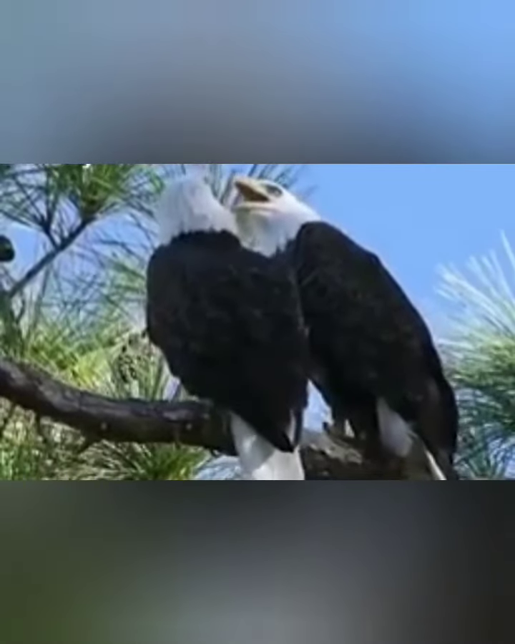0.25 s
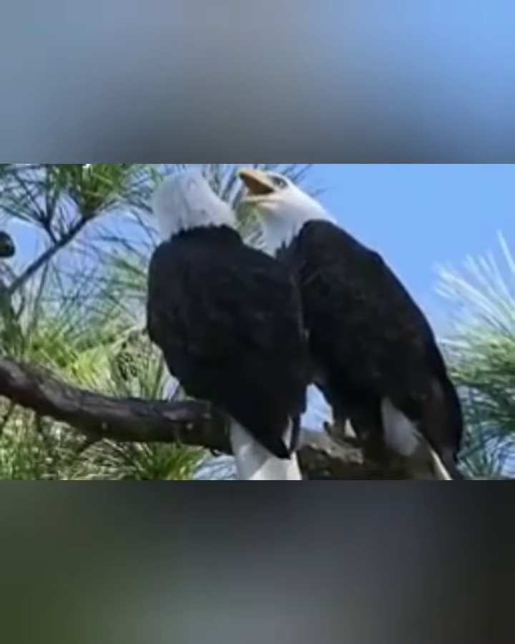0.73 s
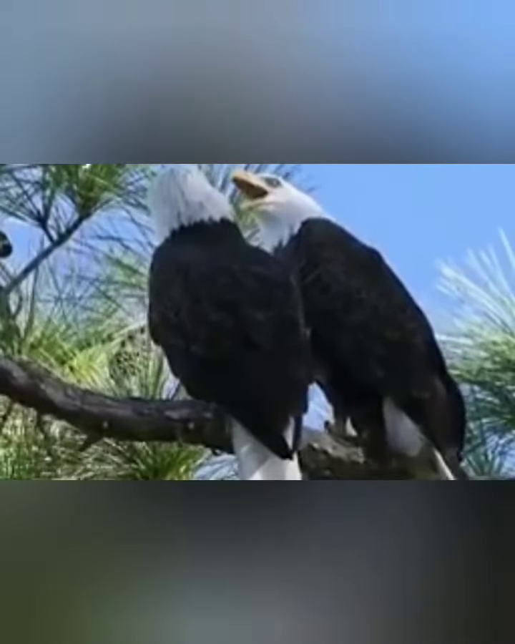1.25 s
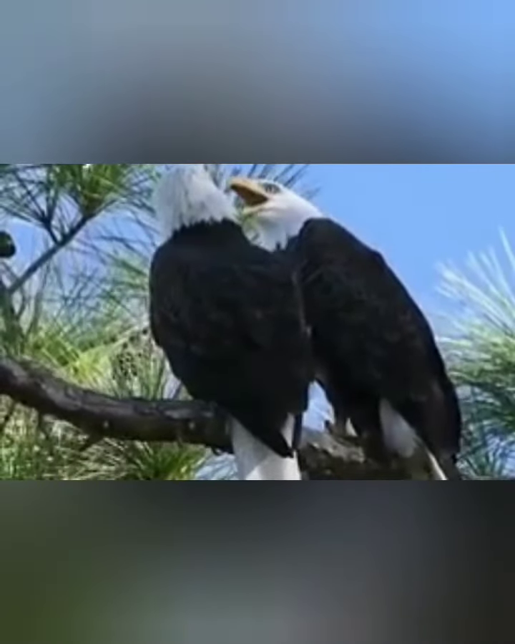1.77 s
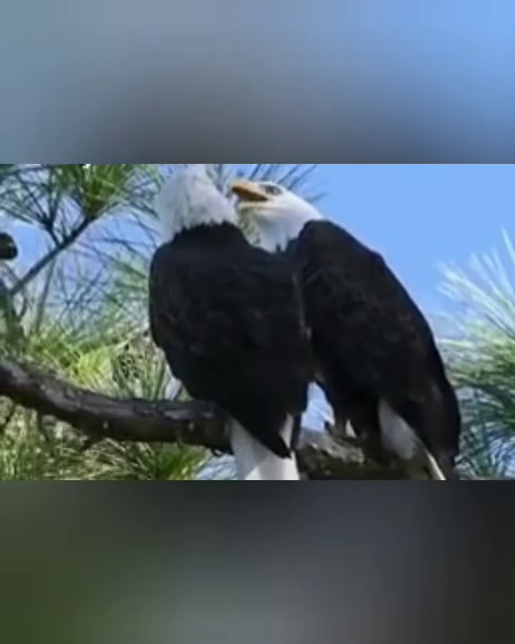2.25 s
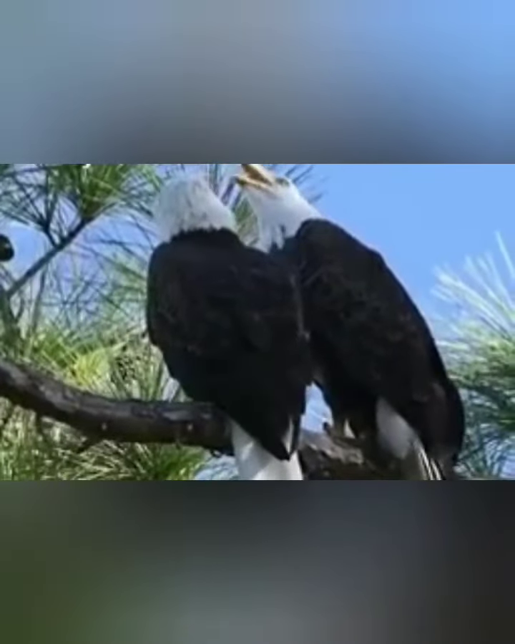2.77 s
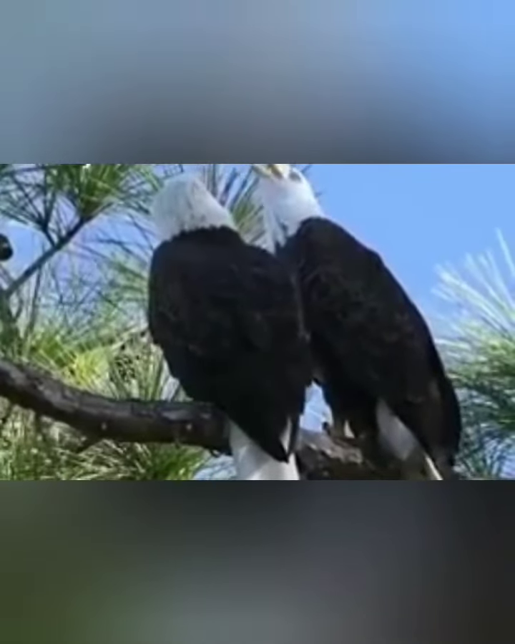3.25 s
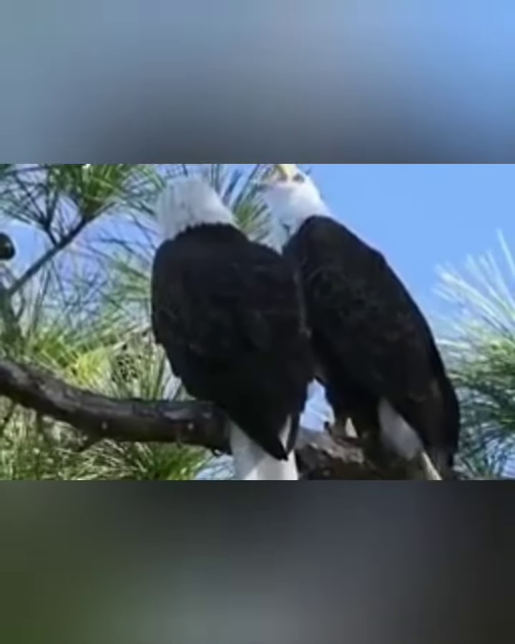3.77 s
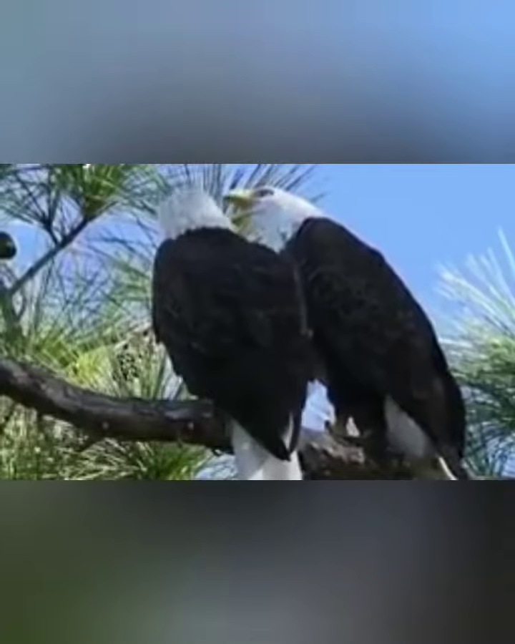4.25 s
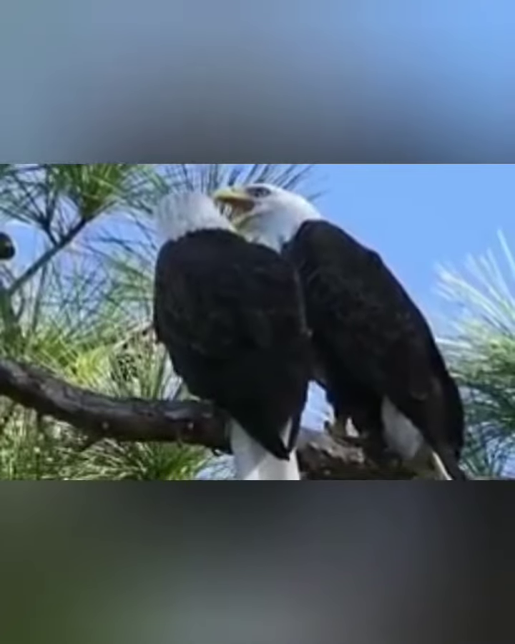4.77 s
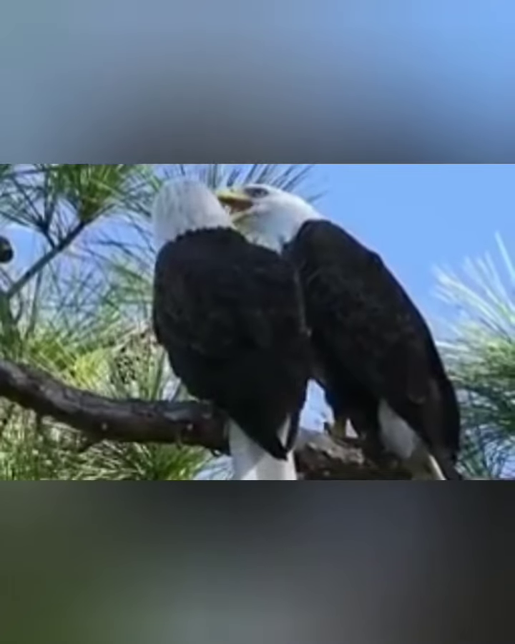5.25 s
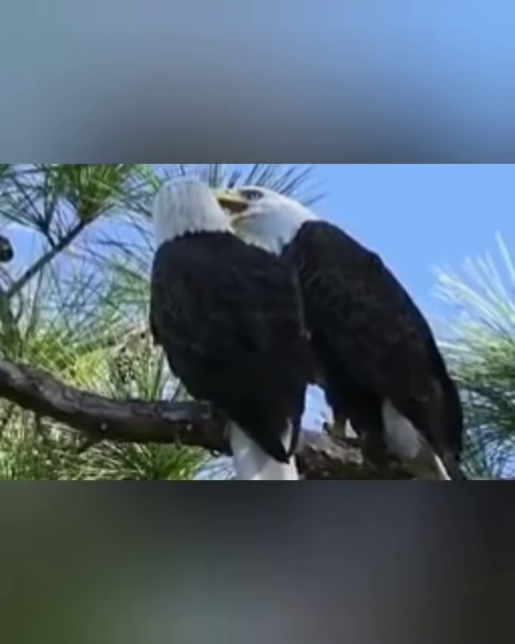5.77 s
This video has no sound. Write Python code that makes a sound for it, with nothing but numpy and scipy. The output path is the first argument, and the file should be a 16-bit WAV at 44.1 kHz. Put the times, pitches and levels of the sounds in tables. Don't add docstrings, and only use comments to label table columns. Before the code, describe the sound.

Two eagles on a branch trade bursts of thin piping whistles, sagging chatter and small croaks over a low, distant traffic wash.

```python
import sys
import numpy as np
from scipy import signal
from scipy.io import wavfile
from scipy.ndimage import uniform_filter1d

SR = 44100
rng = np.random.default_rng(int(sys.argv[2]) if len(sys.argv) > 2 else 0)


def gain_from_db(level_db):
    decades = np.asarray(level_db, float) / 20
    return 10 ** decades


def master(y):
    cut = np.clip(np.atleast_2d(y).T, -1, 1)
    pcm = np.round(cut * 32767)
    wavfile.write(sys.argv[1], SR, pcm.astype(np.int16))


N = 265482

# (start [s], length [s], pitch [Hz], level [dB], overtone re whistle [dB])
SQUEAKS = [
    (2.366, 0.041, 4310, -45.5, -17.5),
    (2.494, 0.04, 4345, -41, -41),
    (3.848, 0.045, 4616, -38.5, -27.5),
    (3.955, 0.055, 4650, -40, -25),
    (4.066, 0.036, 4490, -45.5, -15.5),
    (5.292, 0.035, 4516, -45, -25.5),
    (5.41, 0.036, 4490, -42, -20.5),
]


def evened(x):
    return x / np.sqrt(np.mean(x ** 2) + 1e-20)


def read(points, hz):
    f, value = np.transpose(points)
    return np.interp(np.log(hz + 1), np.log(f + 1), value)


def add(mix, s, sound):
    part = mix[round(s * SR):][:len(sound)]
    part += sound[:len(part)]


def wobble(length, span_s):
    size = max(round(span_s * SR), 2)
    noise = rng.standard_normal(length)
    return evened(uniform_filter1d(uniform_filter1d(noise, size), size))


def resonate(x, hz, width_hz):
    turn = np.exp(2j * np.pi * np.cumsum(hz * np.ones(len(x))) / SR)
    r = np.exp(-np.pi * width_hz / SR)
    return 2 * (turn * signal.lfilter([1 - r], [1, -r], x / turn + 1e-18)).real


def hiss(spectrum, patchy_db):
    frames, hz = N // 256 + 5, np.fft.rfftfreq(1024, 1 / SR)
    a, b, patches = rng.standard_normal((frames, 513, 3)).T
    patches = evened(uniform_filter1d(uniform_filter1d(patches, 8, 0), 16, 1))
    level_db = read(spectrum, hz)[:, None] + patchy_db * patches
    z = (a + 1j * b) * gain_from_db(level_db)
    return evened(signal.istft(z, nperseg=1024, noverlap=768)[1][:N])


def traffic():
    # (frequency [Hz], density [dB per Hz])
    wash = [(12, -87), (20, -77), (77, -3.5), (226, -2), (303, -7.5), (427, -6.5), (545, -6.5),
            (768, -10.5), (957, -14.5), (1140, -16), (2490, -23.5), (3590, -23), (6950, -29.5), (9040, -73),
            (15300, -120)]
    # (frequency [Hz], level [dB])
    engine_tones = [(180.6, -59), (230, -60.5), (142, -60)]
    # (time [s], level [dB])
    drift = [
        (0, 0),
        (2, 0.26),
        (4, 0.2),
        (5.5, 1),
        (6.02, 0),
    ]
    s, drift_db = np.transpose(drift)
    level_db = -50.5 + np.interp(np.arange(N) / SR, s, drift_db) + 1.07 * wobble(N, 0.17)
    noise = rng.standard_normal(N)
    tones = np.zeros(N)
    for hz, db in engine_tones:
        tones += gain_from_db(db) * evened(resonate(resonate(noise, hz, 11.6), hz, 11.6))
    return gain_from_db(level_db) * hiss(wash, patchy_db=1.5) + tones


def air_level_db():
    # (middle [s], half length [s], change [dB])
    shifts = [(0., 0.25, 9), (1.022, .07, -24.5), (1.155, .07, -31), (2.681, 0.037, 13.5), (3.05, 0.085, 3),
              (3.737, 0.044, 6), (4.385, 0.12, -14.5), (4.702, .03, -12), (4.82, .02, -6),
              (4.9, 0.34, -6.5), (5.68, 0.039, 14)]
    rest_db, lead_s, fade_db_per_s = -84.5, 0.0065, 250.5
    t = np.arange(N) / SR
    level_db = rest_db + sum(db * np.clip(1.5 - 1.4 * abs(t - s) / half_s, 0, 1) for s, half_s, db in shifts)
    power = gain_from_db(2 * level_db)
    for s, length_s, _, db, overtone_db in SQUEAKS:
        fall_db = fade_db_per_s * np.maximum(t - s - length_s, 0)
        swell = np.clip(1 + (t - s) / lead_s, 0, 1) ** 2
        power += swell * gain_from_db(2 * (db + overtone_db - fall_db))
    return 10 * np.log10(power)


def treble_air():
    # (frequency [Hz], density [dB per Hz])
    swelling = [(7500, -61.5), (7950, -3.5), (8250, 8), (9200, 3.5), (10000, -1), (10600, -22),
                (11500, -54.5)]
    # (frequency [Hz], density [dB per Hz])
    steady = [(9000, -45), (9800, -5.5), (10800, 1), (11400, -7.5), (13000, -17), (15500, -17.5),
              (15800, -53)]
    air_db = air_level_db()
    top_db = -83.5 + 0.27 * (air_db + 82.5) + 2.5 * wobble(N, .06)
    return gain_from_db(air_db + 2.5) * hiss(swelling, patchy_db=3.5) + gain_from_db(top_db) * hiss(steady, patchy_db=5)


def woods(x):
    # (delay [s], level [dB])
    echoes = [
        (.0031, -18.5),
        (.0087, -8),
        (0.0144, -1.5),
        (0.0234, -24.5),
        (.034, -18),
    ]
    # (frequency [Hz], t60 [s])
    decay = [(1500, 2), (3000, 1.52), (5000, 1.46), (7000, 0.98)]
    near = np.zeros(2500)
    for s, db in echoes:
        near[round(s * SR)] = gain_from_db(db)
    taps = np.zeros(SR)
    at = np.arange(900, SR - 20, 20)
    taps[at + rng.integers(0, 20, len(at))] = rng.choice([-1., 1.], len(at))
    hz, t, z = signal.stft(taps, SR, nperseg=256)
    fall = gain_from_db(-60 * t / read(decay, hz)[:, None]) + 2.8 * gain_from_db(-60 * t / .17)
    tail = signal.istft(z * fall, SR, nperseg=256)[1]
    tail /= np.linalg.norm(tail)
    return signal.oaconvolve(x, near)[:N] + gain_from_db(-6) * signal.fftconvolve(x, tail)[:N]


def rasp(s, length_s, pulse_hz, db, throat_hz, share):
    u = np.linspace(0, 1, round(length_s * SR))
    sag = .24 if throat_hz < 2200 else .03
    phase = 2 * np.pi * np.cumsum(pulse_hz * (1 + sag * (.4 - u ** 2))) / SR
    folds = sum(np.cos(k * phase) for k in range(2, 11))
    breath = rng.standard_normal(len(u))
    drive = (1 - share) * evened(folds) + share * breath
    width_hz = max(.3 * throat_hz, 850)
    throat = resonate(resonate(drive, throat_hz, width_hz), throat_hz, width_hz)
    return s, gain_from_db(db) * evened(throat) * np.sin(np.pi * u ** .6)


def contour(start_s, length_s, hz, db, overtone_db, bends, shape):
    scoop, glide, droop = bends
    attack, hold_end, first_db, last_db = shape
    u = np.array([0, np.clip(attack, .02, .5), np.clip(hold_end, .52, .95), 1])
    pitch_hz = hz * (1 + np.array([-glide / 2 - scoop, -glide / 2, glide / 2, glide / 2 + droop]))
    level_db = db + np.array([first_db, 0, 0, last_db])
    return np.transpose([start_s + length_s * u, pitch_hz, level_db, level_db + overtone_db])


def note(rows, flutter):
    s, *columns = np.transpose(rows)
    t = np.arange(s[0], s[-1], 1 / SR)
    hz, *levels_db = (np.interp(t, s, c) for c in columns)
    levels_db.append(levels_db[-1] - 12.0)
    pitch, level, breath = flutter[:, :len(t)]
    blur = np.clip((-30 - levels_db[0].max()) / 40, .07, .25)
    phase = 2 * np.pi * np.cumsum(hz * (1 + .006 * pitch)) / SR
    tone = sum(gain_from_db(db) * np.sin((k + 1) * phase) for k, db in enumerate(levels_db))
    edges = signal.windows.tukey(len(t), .008 * SR / len(t))
    tremble = gain_from_db(2.4 * level) + blur * breath
    return s[0], np.sqrt(2) * tone * tremble * edges


def eagles():
    chatter = [(.422, 0.025, 2420, -53, -26), (.562, 0.022, 2354, -49, -23),
               (.704, 0.019, 2227, -60.5, -13), (.952, 0.018, 2277, -53.5, -11),
               (1.385, 0.04, 2370, -36.5, -5), (1.529, 0.039, 2363, -35.5, -8),
               (1.682, 0.039, 2265, -40, -9.5), (1.832, 0.035, 2254, -40.5, -12.5),
               (4.666, 0.0483, 2402, -37.5, -10), (4.805, .024, 2343, -34.5, -8.5),
               (4.949, 0.033, 2251, -41.5, -9), (5.095, 0.023, 2234, -42.5, -14.5)]
    openers = [
        (.968, 0.067, 3169, -28.5, -5),
        (1.092, 0.044, 3190, -33.5, -2.5),
        (4.39, 0.054, 3123, -37.5, -12),
        (4.528, 0.034, 3104, -40.5, -7),
    ]
    drops = [
        (1.229, .055, 2577, -36.5, -1),
        (4.544, .04, 2480, -40.5, -9.5),
    ]
    yelps = [
        (2.525, 0.032, 2393, -36, -9.5),
        (2.927, 0.03, 2344, -41, -18),
        (3.318, 0.026, 2407, -44, -22),
        (3.65, 0.029, 2330, -50, -16.5),
    ]
    pipes = [
        (2.947, 0.037, 3074, -37.5, -11.5),
        (3.337, 0.0398, 3077, -38, -11.5),
        (3.668, 0.041, 3140, -38, -13),
        (4.25, 0.08, 3102, -35.5, -16.5),
    ]
    trill = [
        (2.559, .02, 3200, -34, -30),
        (2.597, .108, 3230, -36.5, -19),
    ]
    peeps = [(0.048, 0.04, 3430, -48, -12.5), (0.166, 0.036, 3294, -46.5, -11.1),
             (0.291, 0.042, 3242, -52.5, -9.5), (2.277, 0.028, 3400, -54.5, -22),
             (2.73, 0.04, 3380, -53, -6.5), (3.036, 0.021, 3404, -43, -16.5),
             (3.747, 0.048, 3652, -39, -12), (4.075, 0.071, 3725, -49, -2.5),
             (4.198, 0.044, 3553, -43, -8.5), (4.33, 0.032, 3440, -47.5, -12.5),
             (5.194, 0.031, 3516, -45.5, -21.5), (5.524, 0.046, 3595, -45, -10.5),
             (5.647, 0.043, 3503, -45, -10), (5.779, 0.033, 3410, -47.5, -14),
             (5.92, 0.032, 3290, -51.5, -17)]
    # (start [s], length [s], level [dB], throat [Hz])
    rasps = [(0.023, 0.066, -54, 3530), (0.968, 0.014, -54, 4300), (1.088, 0.02, -49, 5400),
             (1.228, .031, -46, 4940), (1.682, 0.0085, -61, 4100), (1.837, 0.0077, -71, 3900),
             (2.355, 0.046, -61, 5200), (3.036, .03, -55, 3680), (3.83, 0.063, -57, 5450),
             (3.945, .017, -51, 5300), (4.067, 0.04, -60, 4720), (4.522, 0.055, -50.5, 5220),
             (4.66, .018, -54.5, 5000), (5.267, 0.043, -61.5, 5400), (5.388, 0.036, -58.5, 5140)]
    # (start [s], length [s], pulse [Hz], level [dB], throat [Hz])
    croaks = [(0.42, 0.025, 584, -57, 2730), (1.381, 0.015, 620, -41.5, 5200),
              (1.382, 0.0063, 614, -43, 2020), (1.527, 0.011, 791, -42.5, 4860),
              (2.927, 0.031, 756, -52.5, 5000), (3.322, 0.039, 762, -51.5, 4700),
              (1.981, 0.043, 629.5, -50.5, 1570), (2.115, 0.029, 562, -55.5, 1920),
              (4.39, 0.017, 622, -48.5, 2600), (5.222, 0.041, 617, -51, 1660),
              (5.524, 0.023, 900, -58.5, 2740), (5.906, .026, 864, -56, 2750)]

    # (rate [Hz], depth)
    sagging = (-.012, -.025, -.015), (.13, .68, -12, -7), (90, .3)
    opening = (.015, .005, -.075), (.36, .58, -11, -9), (50, .2)
    dropping = (-.025, -.015, -.07), (.3, .62, -8, -8), (50, .2)
    sliding = (.01, .14, .015), (.38, .55, -5, -3), (90, .3)
    rising = (0.0033, .04, .001), (0.52, 1.14, -0.5, -5), (60, 0.35)
    stuttering = (-.01, .045, .01), (.08, .75, -4, -5), (58, 2.4)
    peeping = (.02, .005, -.01), (.3, .7, -13, -7), (100, 1.9)
    squeaking = (.012, .015, .001), (.4, .75, -13, -5), (120, 1.7)

    lead_s = 0.0067
    led_peeps = [(s - lead_s, length_s + lead_s, *rest) for s, length_s, *rest in peeps]
    kinds = [(chatter, sagging), (openers, opening), (drops, dropping), (yelps, sliding),
             (pipes, rising), (trill, stuttering), (led_peeps, peeping), (SQUEAKS, squeaking)]
    voice, t = np.zeros(N), np.arange(8000) / SR
    for notes, (bends, shape, (throb_hz, depth)) in kinds:
        for row in notes:
            flutter = np.array([wobble(8000, .0024), wobble(8000, .0035), wobble(8000, .0006)])
            flutter[1] = .55 * flutter[1] - depth * np.cos(2 * np.pi * throb_hz * t)
            add(voice, *note(contour(*row, bends, shape), flutter))
    for s, length_s, db, throat_hz in rasps:
        add(voice, *rasp(s, length_s, 792, db, throat_hz, share=.87))
    for row in croaks:
        add(voice, *rasp(*row, share=.2))
    return voice


def scene():
    voice = eagles()
    return (gain_from_db(5.0) * voice + woods(voice) + traffic())[None]


def masked(x):
    hz, t, z = signal.stft(x, SR, nperseg=1024, noverlap=768)
    power = (abs(z[:510]) ** 2).reshape(85, 6, -1).mean(axis=1)
    band_db = 10 * np.log10(uniform_filter1d(power, size=7, axis=1) + 1e-14)
    below_db = np.maximum(np.roll(band_db, 1, axis=0), np.roll(band_db, 2, axis=0))
    loud_db = np.maximum(below_db, np.roll(band_db, -1, axis=0) - 9)
    draws = rng.standard_normal((len(t), 85, 2)).T
    luck, step = (evened(uniform_filter1d(v, size=18, axis=1)) for v in draws)
    margin_db = np.minimum(band_db - loud_db, 0) + 11.5 + 7.5 * luck
    usual_db = np.median(band_db, axis=1, keepdims=True)
    margin_db += np.maximum(band_db - usual_db - 14, 0)
    kept = .02 + .98 / (1 + np.exp(np.clip(-margin_db, -40, 40)))
    kept *= gain_from_db(2.5 * step * (band_db < loud_db + 3))
    z[30:510] *= np.repeat(kept, 6, axis=0)[30:]
    return signal.istft(z, SR, nperseg=1024, noverlap=768)[1][:N]


def band_limit(x):
    return signal.sosfilt(signal.butter(12, 15720, fs=SR, output="sos"), x)


def record(dry):
    gap_filter = signal.firwin(151, 7190, window=("kaiser", 9), fs=SR)
    low = signal.oaconvolve(masked(dry[0]), gap_filter, "same")
    mix = (low + treble_air())[None]
    return band_limit(mix)


dry = scene()
out = record(dry)
master(out)
```